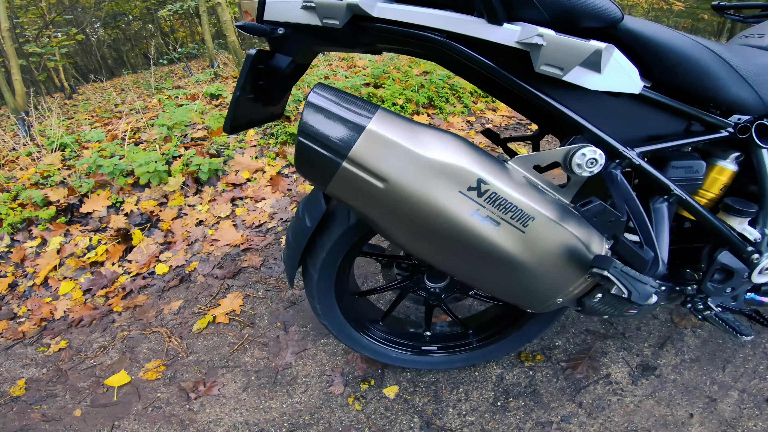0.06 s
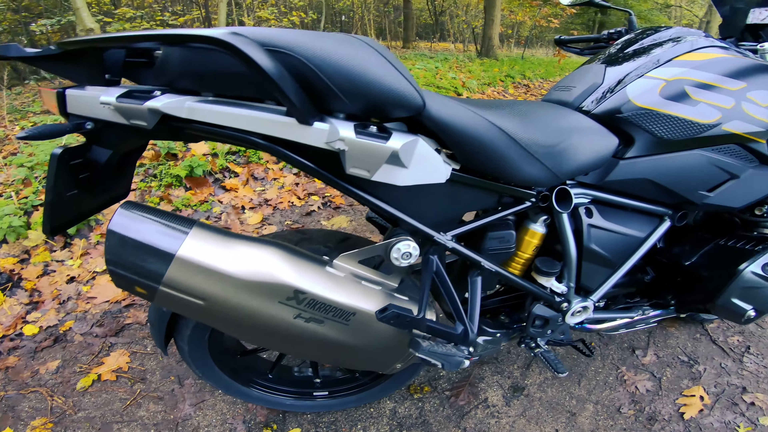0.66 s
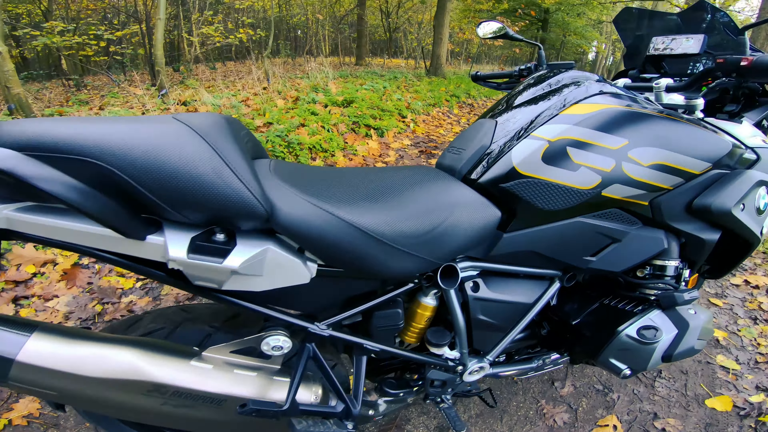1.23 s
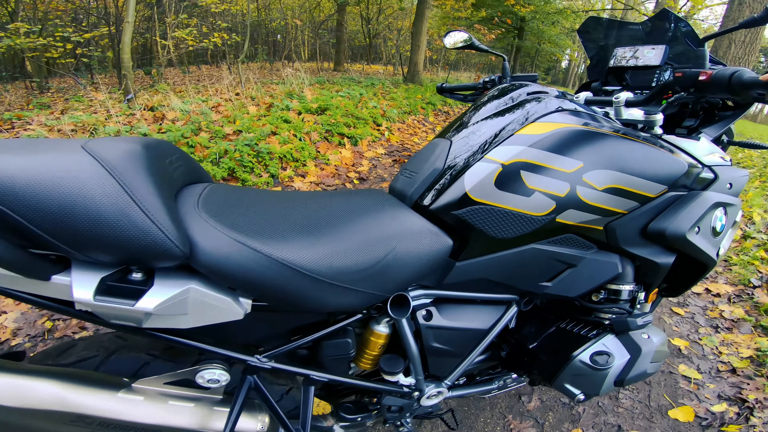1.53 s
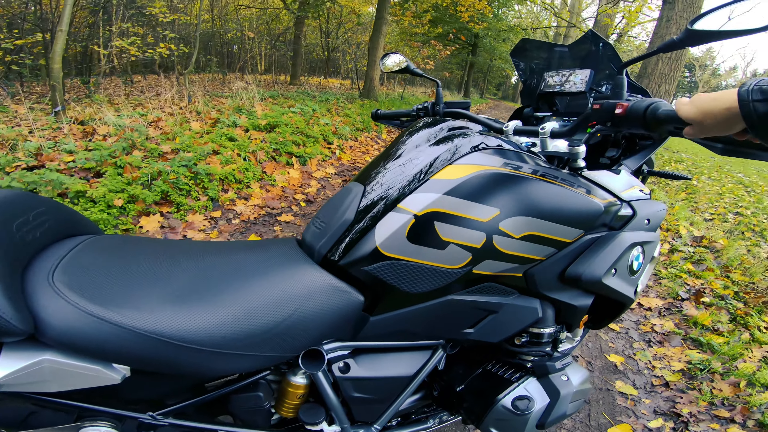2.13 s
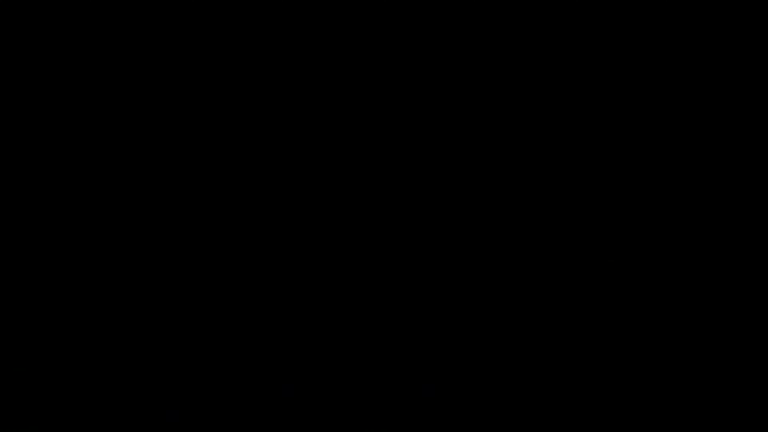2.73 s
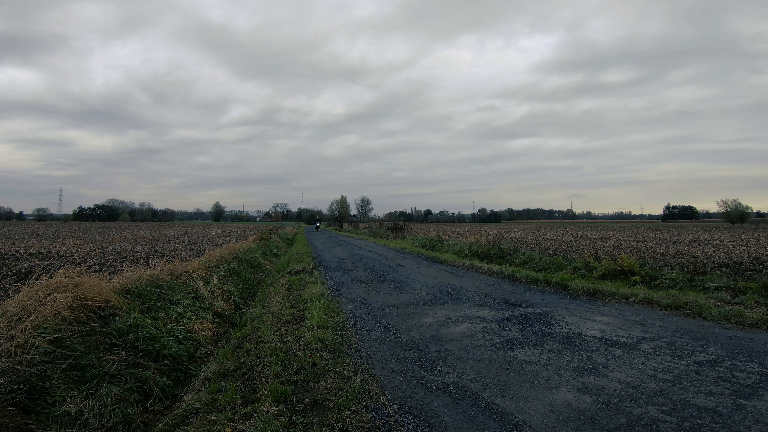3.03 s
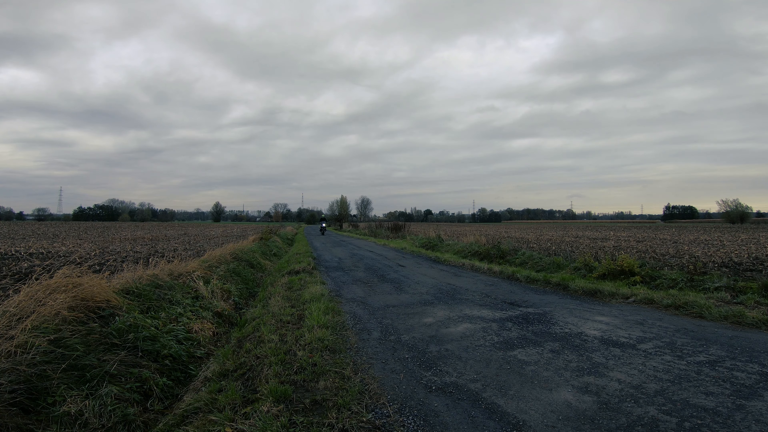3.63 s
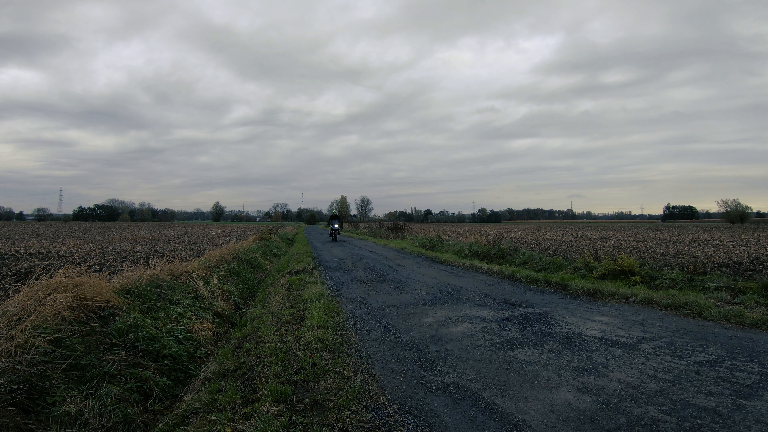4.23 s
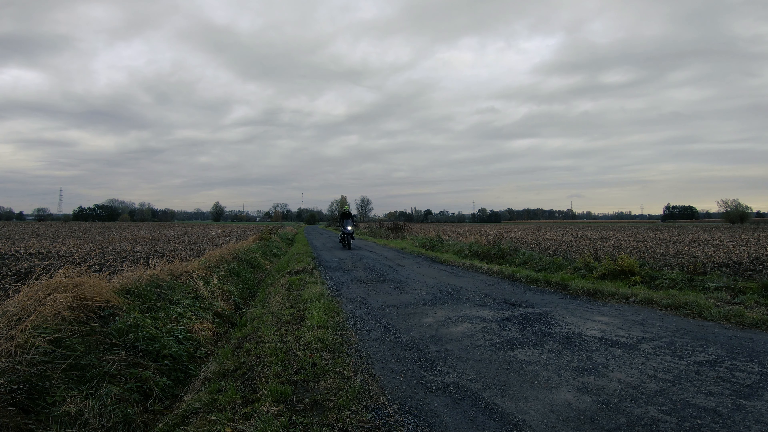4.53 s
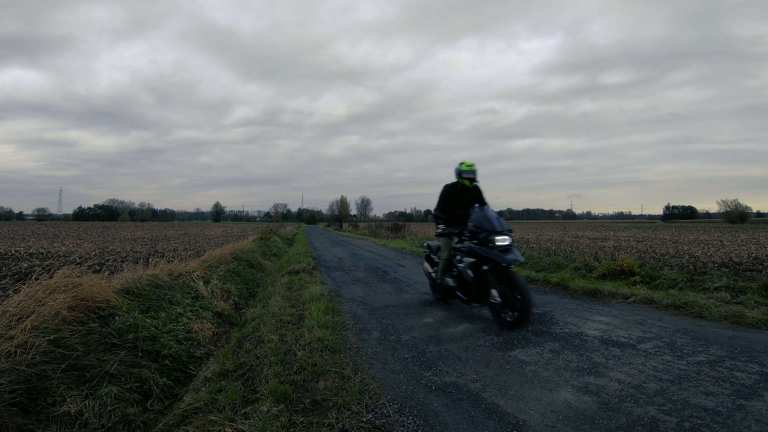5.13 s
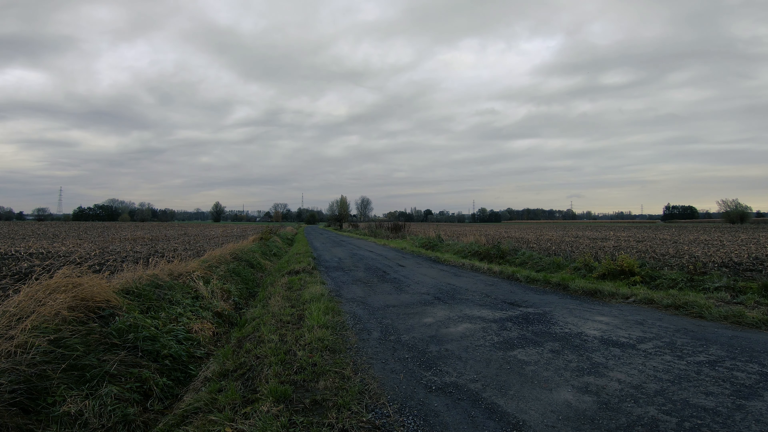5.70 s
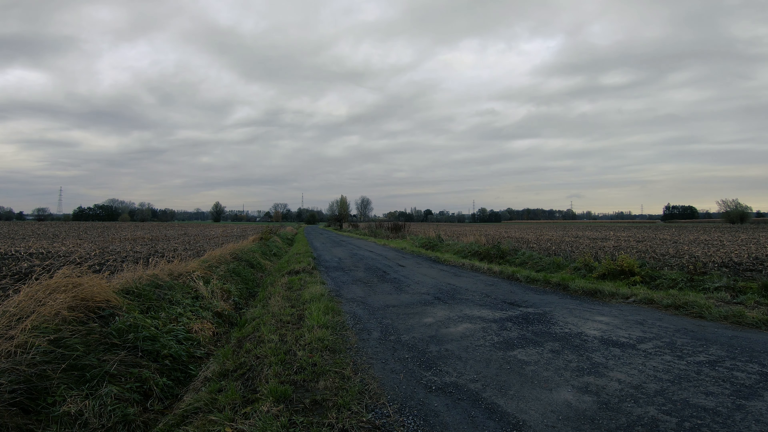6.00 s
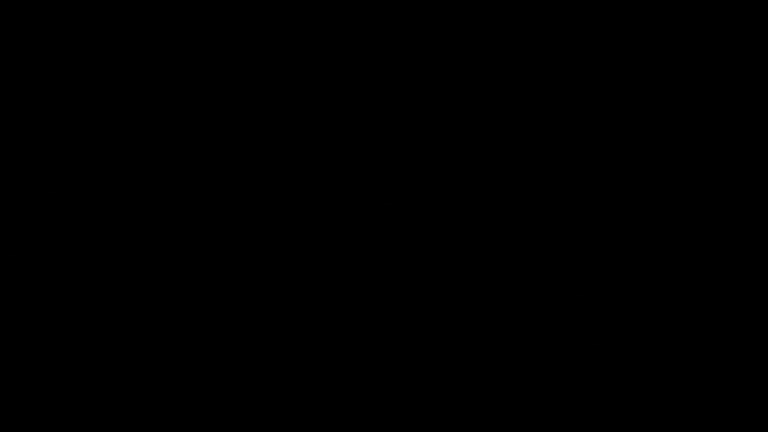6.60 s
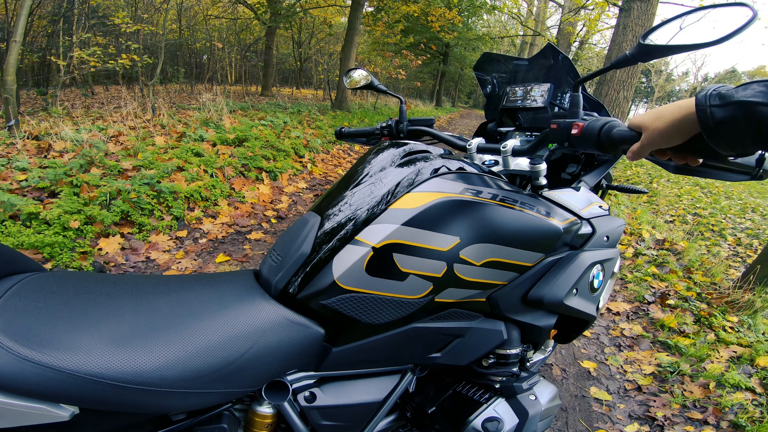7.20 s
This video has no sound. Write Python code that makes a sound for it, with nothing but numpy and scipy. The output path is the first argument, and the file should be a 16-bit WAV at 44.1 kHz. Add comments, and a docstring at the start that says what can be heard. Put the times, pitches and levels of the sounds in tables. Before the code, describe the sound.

Close motorcycle throttle blips and a thumping idle, a cut to the bike approaching and passing on the right, then one last close rev.

```python
"""A sharp bark of throttle, close by: a parked flat-twin motorcycle with a sports silencer is blipped,
runs down to a thumping idle and is blipped again. After a silence it cruises up a country road and
passes on the microphones' right; after another it stands close for one more blip.
Each firing rings the exhaust, valves and gears clatter and whine, and gulps of air ring the airbox.
On the road the low exhaust orders carry far; rasp, growl, whirr and tyre hiss swell as it goes by."""
import sys
import numpy as np
from scipy import signal
from scipy.fft import rfft, irfft, next_fast_len
from scipy.io import wavfile
from scipy.ndimage import uniform_filter1d, map_coordinates

SR = 44100
rng = np.random.default_rng(int(sys.argv[2]) if len(sys.argv) > 2 else 0)


def waveform_to_disk(signal):
    """Save audio, clipped to [-1, 1], as 16-bit WAV at the path in sys.argv[1]."""
    frames = np.transpose(np.atleast_2d(signal))
    scaled = np.clip(frames, -1, 1) * 32767
    samples = np.round(scaled).astype(np.int16)
    wavfile.write(sys.argv[1], SR, samples)


N = 324120
TIME = np.arange(N) / SR


def amp(db):
    """Decibels to gain."""
    return 10 ** (np.asarray(db) / 20)

def steady(x):
    """Scaled to a running rms of 1."""
    size = SR // 9
    power = np.abs(uniform_filter1d(uniform_filter1d(x ** 2, size), size // 2))
    return x / np.sqrt(power + 1e-3 * np.mean(x ** 2))

def along(points, hz):
    """(Hz, value) points read on a log axis."""
    knots_hz, values = np.transpose(points)
    return np.interp(np.log(hz + 1), np.log(knots_hz + 1), values)

def ramp(start, length):
    """Rises from 0 to 1 over length seconds."""
    return np.clip((TIME - start) / length, 0, 1)

def wobble(rate):
    """A smooth random curve, rate knots a second."""
    return map_coordinates(rng.standard_normal(int(N * rate / SR) + 4), [TIME * rate], order=2)

def filtered(x, response):
    """x times a response of frequency."""
    size = next_fast_len(N + SR // 4)
    return irfft(rfft(x, size) * response(np.fft.rfftfreq(size, 1 / SR)), size)[..., :N]

def ring(x, colour, size=8192):
    """x through a causal body of this colour whose answer to a pulse peaks at 1."""
    cepstrum = irfft(np.log(amp(along(colour, np.fft.rfftfreq(size, 1 / SR)))))
    cepstrum[1:size // 2] *= 2
    cepstrum[size // 2 + 1:] = 0
    answer = irfft(np.exp(rfft(cepstrum)))
    return signal.fftconvolve(x, answer / np.abs(answer).max())[:N]

# Likeness of the two microphones close to the engine: (frequency [Hz], correlation [-1..1])
CLOSE_LIKENESS = [(380, 1), (950, 0.5), (2400, 0.5), (6000, 0), (15000, -0.25)]
def rush(colour, likeness=CLOSE_LIKENESS):
    """Stereo noise whose middle has rms 1."""
    def response(hz):
        width = np.tan(np.arccos(np.clip(along(likeness, hz), -.95, .999)) / 2)
        return amp(along(colour, hz)) * [np.ones_like(hz), width]
    mid, side = filtered(rng.standard_normal((2, N)), response)
    return np.array([mid + side, mid - side]) / mid.std()

def panned(lean_db):
    """Left and right gains with a mean of 1; a positive lean is to the left."""
    gains = amp(np.vstack([lean_db / 2, -lean_db / 2]))
    return gains / gains.mean(axis=0)

def turns(speed):
    """Crank turns since the start of a speed curve: one firing to each."""
    return np.cumsum(np.interp(TIME, *np.transpose(speed), left=0)) / SR

def pulses(crank, scatter_db):
    """One pulse of random size at each whole turn."""
    at = np.flatnonzero(np.diff(np.floor(crank)) > 0)
    train = np.zeros(N)
    train[at] = amp(scatter_db * rng.standard_normal(len(at)))
    return train

def strikes(events):
    """A train of single pulses from (s, dB) rows."""
    train = np.zeros(N)
    for s, db in events:
        train[round(s * SR)] = amp(db)
    return train

def bursts(train, life):
    """An envelope that swells after each pulse, peaks after life seconds and fades."""
    age = TIME[:SR // 10] / life
    return signal.fftconvolve(train, age * np.exp(1 - age))[:N]


# Two knocks from the engine running down, one from a stone on the road: (time [s], pitch [Hz], level [dB])
SHORT_KNOCKS = [(.302, 3580, -26), (0.354, 2910, -24.5), (5.052, 1260, -21)]
def knocks(t60_s=0.032):
    """Each knock rings briefly at one pitch, a little right of the microphones."""
    t = TIME[:SR // 10]
    decay = amp(-60 * t / t60_s)
    rings = (signal.fftconvolve(strikes([(s, db)]), np.sin(2 * np.pi * hz * t) * decay)[:N]
             for s, hz, db in SHORT_KNOCKS)
    return sum(rings) * panned(-6)

# The rider squeezes the throttle on the road: (on [s], off [s], opening [0-1])
ROAD_THROTTLE = [(3.552, 3.76, 0.77), (4.219, 4.368, 0.6), (5.256, 5.469, 0), (5.689, 5.778, 0.2),
                 (6.463, 6.626, 0.6)]
def pull(roll_s=0.11):
    """The throttle's opening as it is rolled on and off."""
    return sum(opening * (ramp(on, roll_s) - ramp(off, roll_s)) for on, off, opening in ROAD_THROTTLE)

ABREAST_S, NEAR_S = 5.456, 0.18  # the moment of passing; how long either side of it counts as near
def passing():
    """From the roadside: distance in multiples of the closest, bearing from 1 (ahead) to -1 (behind)."""
    to_go = (ABREAST_S - TIME) / NEAR_S
    distance = np.hypot(1, to_go)
    return distance, to_go / distance

def pass_db(law, far_s=1.8):
    """Level of one part of the passing machine; beyond far_s seconds of riding it hardly fades more."""
    abreast_db, loss_db, ahead_db, pull_db = law
    distance, bearing = passing()
    doublings = np.log2(distance / np.hypot(1, distance * NEAR_S / far_s))
    return abreast_db - loss_db * doublings + ahead_db * bearing + pull_db * pull()

# Tyres from the roadside: (frequency [Hz], level [dB])
TYRE_COLOUR = [(2500, -16), (4400, -3.5), (7900, -10), (9400, -8), (11000, -27), (12500, -19.5),
               (15700, -49.5)]
# Their pass law: (base level [dB], loss per doubled distance [dB], gain ahead [dB], full pull [dB])
TYRE_LAW = (-40.5, 5.5, 5, 0.5)
def tyres(abreast):
    """Tyres hiss on the road; the finest hiss reaches the microphones only from abreast."""
    hiss = amp(pass_db(TYRE_LAW) + 1.6 * wobble(8.2)) * rush(TYRE_COLOUR, [(4000, 0.68)])
    return hiss + amp(-42) * abreast * rush([(5000, -16), (9500, 1), (15700, -26)])

# The approaching engine's whirr: (frequency [Hz], level [dB])
WHIRR_COLOUR = [(200, -32.5), (900, -2.5), (1750, -2), (2600, 1), (3500, -5.5), (9000, -41)]
# Its pass law: (base, loss, ahead, pull) [dB]
WHIRR_LAW = (-30, 6.5, 6.5, 2.5)
def whirr(throb, abreast):
    """The whirr is thrown forward, so it drops as the machine draws alongside."""
    level_db = pass_db(WHIRR_LAW) - 5.5 * abreast + 0.9 * wobble(18)
    return amp(level_db) * throb * rush(WHIRR_COLOUR, [(3000, 0.98)])

# The cylinders from the roadside: (frequency [Hz], level [dB])
GROWL_COLOUR = [(300, -31.5), (720, -9), (950, -12), (1600, -10), (6000, -50.5)]
# Their pass law: (base, loss, ahead, pull) [dB]
GROWL_LAW = (-34.5, 4, 3.5, 3)
def growl(throb, abreast, delay_s=.0012, shrink_s=0.25):
    """The cylinders growl; their road echo cuts hollows that slide down nearing and up leaving."""
    direct = throb * rush(GROWL_COLOUR, [(1000, 0.8)])
    delay = delay_s / np.hypot(1, (TIME - ABREAST_S) / shrink_s)
    echo = np.array([np.interp(TIME - delay, TIME, side) for side in direct])
    return amp(pass_db(GROWL_LAW) + 5.5 * abreast) * (direct + 0.28 * echo)

# Pass law of the outflowing gas: (base, loss, ahead, pull) [dB]
FLOW_LAW = (-30, 2.86, 2, 3)
def gas_flow(puffs):
    """Gas rushes from the outlet with each puff."""
    noise = rush([(30, -4), (350, -7.5), (680, -11.5), (1200, -58.5)], [(300, 1.0)])
    return amp(pass_db(FLOW_LAW)) * steady(.6 + puffs) * noise

def road_echo(hz, strength, delay_s=0.0029, shrink_s=0.067, tail_passes_s=5.474):
    """Gain of an exhaust tone with its road echo, which lags most as the silencer goes by."""
    delay = delay_s / np.hypot(1, (TIME - tail_passes_s) / shrink_s)
    return np.abs(1 + strength * np.exp(-2j * np.pi * hz * delay)) / (1 + strength)

# The exhaust's rasp from the roadside: (frequency [Hz], level [dB])
RASP_COLOUR = [(240, -63.5), (300, 3), (520, -2.5), (620, -4), (720, -10), (850, -18.5), (2500, -58)]
# Its pass law: (base, loss, ahead, pull) [dB]
RASP_LAW = (-31.5, 3, 3, 3.5)
def rasp(crank, rate, abreast, brighten_db=1.8):
    """The higher exhaust orders wander in strength over the field, louder and brighter abreast."""
    orders = range(5, 12)
    gains = amp([along(RASP_COLOUR, k * rate) + k * brighten_db * abreast + 2.2 * wobble(9)
                 for k in orders])
    gains /= np.sqrt(np.sum(gains ** 2, axis=0) / 2)
    tones = 0
    for k, gain in zip(orders, gains):
        phase = 2 * np.pi * k * crank - k * k / 4 + .25 * wobble(30)
        tones += gain * road_echo(k * rate, strength=.55) * np.cos(phase)
    return amp(pass_db(RASP_LAW) + 7.5 * abreast) * tones

# Pass laws of exhaust orders 1-4, a row each: (base, loss, ahead, pull) [dB]
HUM_LAWS = [(-14, 4, 3, 1), (-12, 3, 1.3, 0.5), (-13.5, 4.5, 1.37, 6), (-33.5, 3.5, 3.5, 14)]
# Their echo off the road: (strength [0-1]) for each order
HUM_ECHOES = (0.4, 0.56, 0.88, 0.25)
# The hum turns hollow as one order sags: (time [s], half-length [s], change of each order 1-4 [dB])
HUM_SAGS = [(4.2, 0.36, 0.5, -5, 2, 0), (4.72, 0.19, 0, -2, 5, 0.092), (5.11, .14, -9, 1.5, -0.5, 1)]
def hum(crank, rate, abreast, lag_rad=1.1, slip_rad=1.9):
    """Four low orders: in step (pulling or abreast) they puff, out of step they melt into a hum."""
    sags = sum(np.outer(db, np.exp(-((TIME - s) / half) ** 2)) for s, half, *db in HUM_SAGS)
    slip = slip_rad * (1 - np.clip(pull() + abreast, 0, 1))
    tones = 0
    for k, (law, sag_db, echo) in enumerate(zip(HUM_LAWS, sags, HUM_ECHOES), 1):
        level_db = pass_db(law, far_s=30) + sag_db + 0.79 * wobble(25)
        phase = 2 * np.pi * k * crank - lag_rad * (k - 1) + slip * ((k > 1) - k / 3)
        tones += amp(level_db) * road_echo(k * rate, echo) * np.sqrt(2) * np.cos(phase)
    return tones * (1 + 0.045 * np.cos(np.pi * crank))  # the two cylinders do not blow quite alike

# Engine speed at the roadside microphones, Doppler shift included: (time [s], firing rate [Hz])
ROAD_SPEED = [(3.03, 82.8), (3.36, 86.8), (3.44, 84.2), (3.62, 84.2), (3.78, 92.8), (3.89, 85.2),
              (4.42, 87.6), (4.5, 86.0), (4.91, 85.6), (5.08, 92.6), (5.15, 84.8), (5.24, 88.5),
              (5.36, 85.0), (5.485, 91.0), (5.55, 75.5), (5.63, 72.6), (5.79, 83.2), (5.89, 76.4),
              (6.15, 78.4), (6.43, 72.5), (6.63, 80.0)]
def riding(lean_abreast_db=-16, lean_behind_db=-7):
    """The machine comes up the country road and passes on the right."""
    crank = turns(ROAD_SPEED) + .004 * wobble(30)
    rate = np.interp(TIME, *np.transpose(ROAD_SPEED))
    _, bearing = passing()
    lean_db = lean_abreast_db * (1 - bearing ** 2) + lean_behind_db * (1 - bearing) / 2
    abreast = np.exp(-((TIME - ABREAST_S) / 0.12) ** 2)  # the outlet is in full view
    puffs = bursts(pulses(crank, scatter_db=2), life=.0015)
    throb = steady(1 + .6 * puffs)
    outlet = (gas_flow(puffs) + rasp(crank, rate, abreast)) * panned(0.46 * lean_db)
    engine = (growl(throb, abreast) + whirr(throb, abreast)) * panned(1.09 * lean_db)
    return tyres(abreast) * panned(0.5 * lean_db) + engine + outlet + hum(crank, rate, abreast)


# The engine casing from close by: (frequency [Hz], level [dB])
CASING_COLOUR = [(350, -28.5), (600, 0), (1100, -4.5), (1450, -3.5), (2190, -6), (2750, -6), (3770, -14),
                 (5160, -18), (7350, -10.5), (11100, -35), (15600, -50.5)]
def casing(t60_s=.09, power_share=.13):
    """The engine's metal rings briefly at many close modes."""
    direct = rush(CASING_COLOUR)
    t = TIME[:SR // 10]
    tail = rng.standard_normal(len(t)) * amp(-60 * t / t60_s)
    rung = signal.fftconvolve(direct, [tail / np.linalg.norm(tail)], axes=1)[:, :N]
    return np.sqrt(1 - power_share) * direct + np.sqrt(power_share) * rung

# Gear tones: (order [multiple of crank speed], level before the casing's colour [dB])
GEAR_TONES = [(27, -7), (57, -2.5)]
def gear_whine(crank, throttle, flutter_db=3, jitter_rad=1.1):
    """Fast gears sing off the throttle, loudest where they meet a resonance of the casing."""
    rate = np.abs(np.gradient(crank)) * SR
    tones = 0
    for order, db in GEAR_TONES:
        level_db = db + along(CASING_COLOUR, order * rate) + flutter_db * wobble(22)
        tones += amp(level_db) * np.sin(2 * np.pi * order * crank + jitter_rad * wobble(70))
    return tones * np.minimum(rate / 50, 1) ** 2 * (1 - throttle)

# The valves snap shut: (heavy [crank turns], light [crank turns])
VALVE_TIMING = (.59, .93)
# Their bright tick: (frequency [Hz], level [dB])
VALVE_COLOUR = [(3500, -14.5), (8000, 0.5), (15000, -34.5)]
# The cylinder fins' ring: (frequency [Hz], level [dB])
FIN_COLOUR = [(900, -52), (1520, -2), (2400, -39.5)]
# The metal's place between the microphones: (frequency [Hz], left minus right [dB])
METAL_LEAN = [(380, 10.5), (950, -5), (6500, -9), (15000, 4.5)]
def clatter(crank, clatter_db, throttle):
    """Valves snap shut twice a turn over ticking chains; casing, fins and block ring, gears whine."""
    heavy, light = (pulses(crank - turn, scatter_db=0) for turn in VALVE_TIMING)
    chains = bursts(pulses(4 * crank + 0.3 * wobble(60), scatter_db=1.5), life=0.0016)
    rattle = steady(.75 + .85 * bursts(heavy, life=.0035) + .4 * chains)
    valves = amp(-46) * bursts(heavy + light, life=.002) * rush(VALVE_COLOUR)
    metal = rattle * (amp(clatter_db) * casing() + amp(-48) * rush(FIN_COLOUR)) + valves
    block = amp(9) * rattle * rush([(60, 2.5), (250, 9.5), (430, -20.5), (2000, -57.5)])
    whine = gear_whine(crank, throttle) * panned(-4)
    return filtered(metal, lambda hz: panned(along(METAL_LEAN, hz))) + amp(clatter_db) * (block + whine)

# Gasps at the intake, close by: (time [s], level [dB])
INTAKE_GASPS = [(.098, -34.5), (2.148, -35), (7.1, -45)]
def gasps():
    """Air hisses through the throttle as it snaps open."""
    envelope = bursts(strikes(INTAKE_GASPS), life=0.015)
    return envelope * rush([(800, -13.5), (3500, 9.5), (7500, 8), (15000, -28.5)])

# The airbox's resonance: (frequency [Hz], level [dB])
AIRBOX_COLOUR = [(400, -35), (800, -21), (1040, 3.5), (1650, -11), (6000, -37)]
def airbox(crank, level_db, lag_turns=0.23):
    """A gulp of air follows each firing and rings the airbox."""
    return ring(pulses(crank - lag_turns, scatter_db=3.5) * amp(level_db), AIRBOX_COLOUR)

# The pistons' drone at the outlet: (frequency [Hz], level [dB])
DRONE_COLOUR = [(15, -54), (37, 0), (55, 8.5), (112, 3.5), (150, -19.5), (900, -100)]
# The silencer's ring on the overrun: (frequency [Hz], level [dB])
OVERRUN_COLOUR = [(70, -37.5), (150, 5.5), (280, 3.5), (385, -24.5), (495, -5.5), (750, -44), (3000, -94)]
def piston_drone(crank, burble, drone_db, overrun_db, lag_turns=0.5464):
    """Between firings a piston pushes out the rest of the gas; at speed this rings the silencer."""
    push = pulses(crank - lag_turns, scatter_db=.9)
    drone = amp(drone_db) * steady(ring(push, DRONE_COLOUR))
    return drone + amp(overrun_db) * steady(ring(push / burble, OVERRUN_COLOUR))

def pipe(x, delay_s=0.0162, echo=0.14):
    """A pressure wave runs back up the exhaust and leaves again, weaker and duller each time."""
    round_trip = lambda hz: echo / (1 + (hz / 500) ** 2) * np.exp(-2j * np.pi * hz * delay_s)
    return filtered(x, lambda hz: 1 / (1 - round_trip(hz)))

# A firing's thump, close to the silencer: (frequency [Hz], level [dB])
THUMP_COLOUR = [(15, -18.5), (40, 10.5), (90, 0.5), (135, 11.5), (255, 1.5), (300, -9.5), (350, -54),
                (1200, -68.5)]
# Its bark: (frequency [Hz], level [dB])
BARK_COLOUR = [(100, -27.5), (220, 6.5), (310, 9.5), (380, -3.5), (500, 3.5), (600, -21), (750, -7.5),
               (950, -14), (4000, -46.5), (12000, -77)]
# Unburnt fuel pops in the silencer on the overrun: (time [s], level [dB])
FUEL_POPS = [(.465, -18.5), (7.269, -10)]
def exhaust(crank, thump_db, bark_db, drone_db, overrun_db, jet_db):
    """Each firing thumps and barks down the pipe, and its gas jet tears at the outlet just after."""
    firing = pulses(crank, scatter_db=1)
    weakness = np.clip((-thump_db - 7) / 5, 0, 1)
    burble = amp(3.2 * weakness * wobble(45))  # weak charges burn unevenly
    thump = pipe(ring(firing * burble * amp(thump_db), THUMP_COLOUR))
    drone = piston_drone(crank, burble, drone_db, overrun_db)
    blast = firing * amp(bark_db + wobble(50))
    bark = ring(blast + strikes(FUEL_POPS), BARK_COLOUR)
    jet_noise = rush([(200, -22), (500, 9.5), (1100, -11), (2500, -11), (15000, -57.5)])
    jet = amp(jet_db) * bursts(blast, life=0.0018) * jet_noise
    lags_s = [[.00005], [0]]  # the silencer is a little nearer the right microphone
    return filtered(thump + drone + bark, lambda hz: np.exp(-2j * np.pi * hz * lags_s)) + jet

# Blips: (opens [s], rise [s], shuts [s], thump [dB], bark [dB], jet [dB re bark], airbox [dB re bark])
THROTTLE_BLIPS = [(.075, 0.035, 0.21, -5, -11.5, -8.5, -26), (2.08, 0.15, 2.266, -5.5, -12.5, -7, -3.5),
                  (7.085, 0.033, 7.242, -6, -13.5, -10, -14)]
# Throttle shut: (firing rate [Hz], thump [dB], bark [dB], drone [dB], overrun [dB], clatter [dB])
COASTING_LEVELS = [(18.2, -6, -25.5, -29.5, -49.5, -42), (29.4, -10.5, -30.5, -23.5, -35, -39),
                   (44.3, -13, -29, -22.5, -32, -38), (45.9, -15, -30.5, -14.5, -25, -37.5),
                   (55.2, -29, -28, -14.5, -21.5, -33.5)]
# A brief lull after each blip, while the thump carries on: (thump, bark, drone, overrun, clatter) [dB]
BLIP_LULL_DB = (9.5, -3.5, -8.5, -10.5, -7)
# The microphones move from silencer to handlebar: (thump, bark, drone, overrun, clatter) [dB]
HANDLEBAR_DB = (0.5, -8.5, -0.5, -0.5, 2)
def effort(crank, shut_s=0.025, open_drone_db=-27.5, open_overrun_db=-39):
    """Throttle opening and the parked engine's levels in dB, from its speed and the latest blip."""
    latest = np.searchsorted([blip[0] for blip in THROTTLE_BLIPS[1:]], TIME)
    blip = np.transpose(THROTTLE_BLIPS)[:, latest]
    opens, rise, shuts, open_thump_db, open_bark_db, jet_db, airbox_db = blip
    shut = ramp(shuts, shut_s)
    throttle = ramp(opens, rise) - shut
    lull = shut * (1 - ramp(shuts + 0.019, length=0.063))
    moved = ramp(start=0.19, length=2.37)
    rate = np.gradient(crank) * SR
    speeds, *levels = np.transpose(COASTING_LEVELS)
    thump, bark, drone, overrun, metal = (
        np.interp(rate, speeds, db) + lull * lull_db + moved * moved_db
        for db, lull_db, moved_db in zip(levels, BLIP_LULL_DB, HANDLEBAR_DB))
    opened = lambda coasting, full: coasting + throttle * (full - coasting)
    return (throttle, opened(thump, open_thump_db), opened(bark, open_bark_db),
            opened(drone, open_drone_db), opened(overrun, open_overrun_db), metal, jet_db, airbox_db)

# Blip, run-down to idle, blip: (time [s], firing rate [Hz])
OPENING_SPEED = [(0, 46.86), (0.06, 32.78), (0.11, 38.61), (0.19, 63.11), (0.4, 53.41), (0.62, 44.39),
                 (0.85, 35.98), (1.05, 30.84), (1.3, 24.01), (1.5, 18.2), (1.8, 17.05), (2.02, 19.23),
                 (2.11, 23.66), (2.17, 31.28), (2.25, 56.48), (2.45, 45.82), (2.7, 40.15)]
# The closing blip: (time [s], firing rate [Hz])
CLOSING_SPEED = [(6.955, 38.37), (7.1, 37.08), (7.22, 67.65), (7.35, 63.59)]
def standing(closing):
    """The parked machine from close beside it: intake, exhaust and clatter."""
    crank = np.where(closing, turns(CLOSING_SPEED), turns(OPENING_SPEED))
    throttle, thump_db, bark_db, drone_db, overrun_db, clatter_db, jet_db, airbox_db = effort(crank)
    clatter_db[closing] += 1  # the microphones are then nearer the cylinder head
    air = gasps()
    outlet = exhaust(crank, thump_db, bark_db, drone_db, overrun_db, jet_db)
    metal = clatter(crank, clatter_db, throttle)
    honk = airbox(crank, bark_db + airbox_db)
    return (air + honk) * panned(-6) + metal + outlet


# Microphones beside the machine, at the roadside, beside it again: (start [s], end [s])
POSITIONS = [(0, 2.699), (3.032, 6.639), (6.969, 7.35)]
def scene(cut_s=.001):
    """Three listening positions in turn, with hard cuts and silence between them."""
    opening, road, closing = [(TIME >= start) * (1 - ramp(end, cut_s)) for start, end in POSITIONS]
    parked = standing(closing=TIME >= POSITIONS[1][0])
    return parked * (opening + closing) + riding() * road + knocks()

def record(dry, ceiling=.9, top_hz=15750):
    """The recorder rounds off the highest peaks and keeps nothing above its band limit."""
    rounded = dry / (1 + np.abs(dry / ceiling) ** 6) ** (1 / 6)
    return filtered(rounded, lambda hz: hz < top_hz)


dry = scene()
out = record(dry)
waveform_to_disk(out)
```